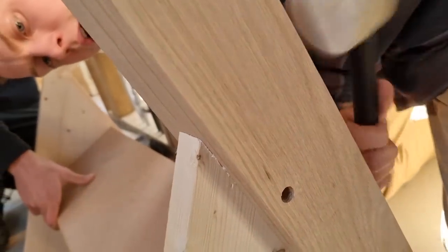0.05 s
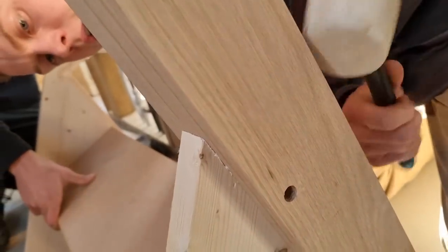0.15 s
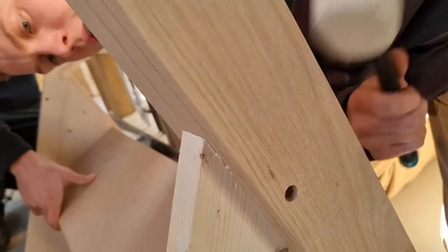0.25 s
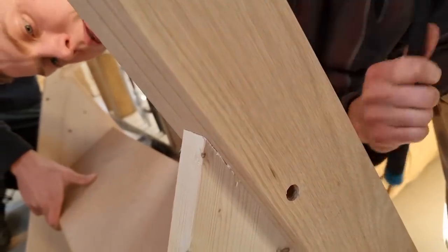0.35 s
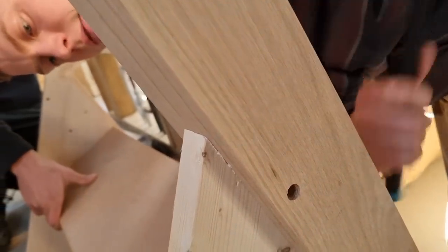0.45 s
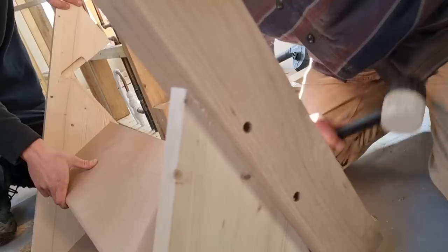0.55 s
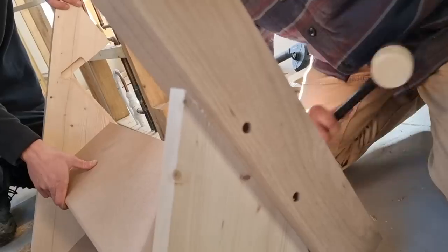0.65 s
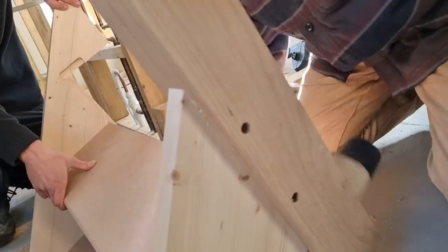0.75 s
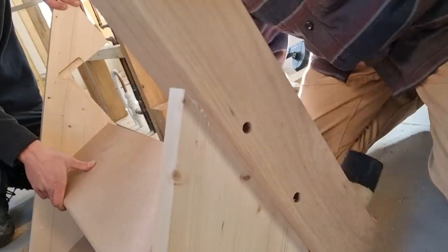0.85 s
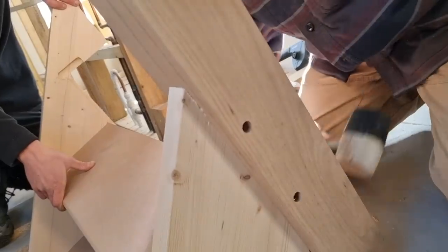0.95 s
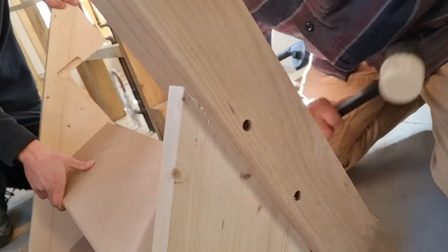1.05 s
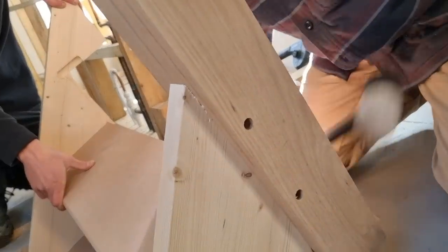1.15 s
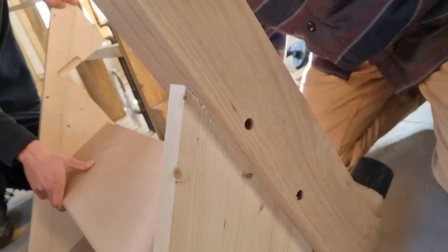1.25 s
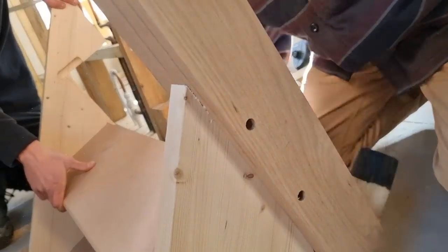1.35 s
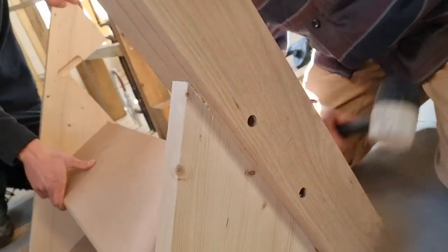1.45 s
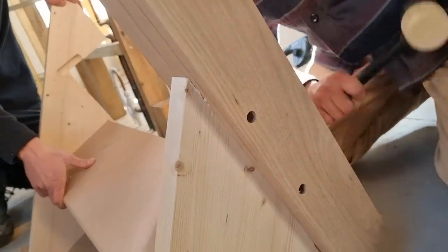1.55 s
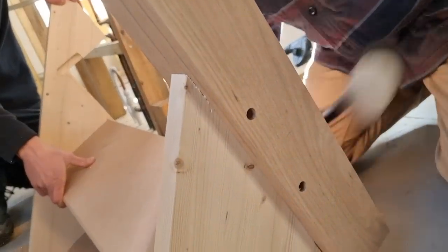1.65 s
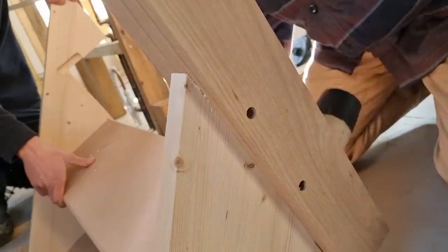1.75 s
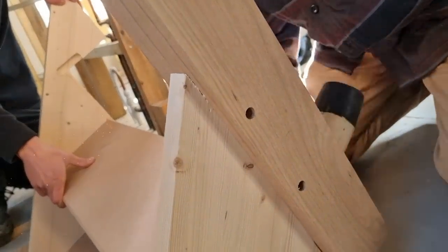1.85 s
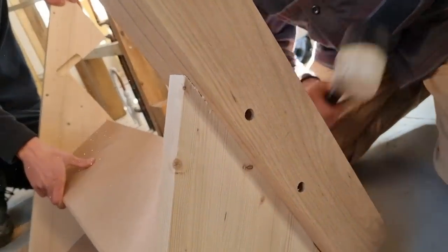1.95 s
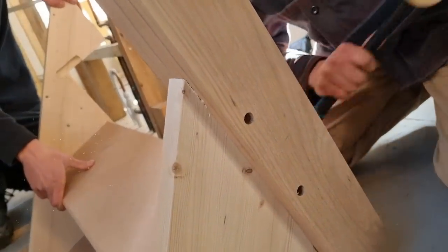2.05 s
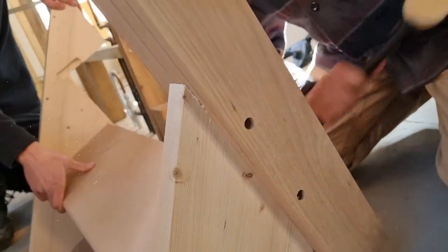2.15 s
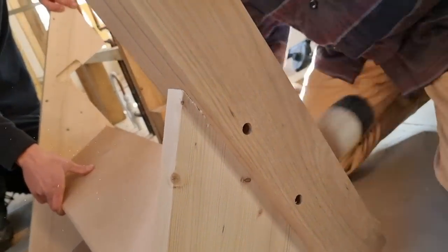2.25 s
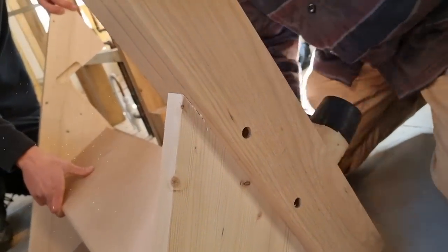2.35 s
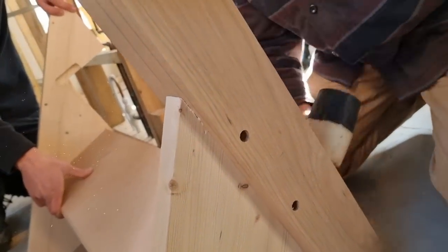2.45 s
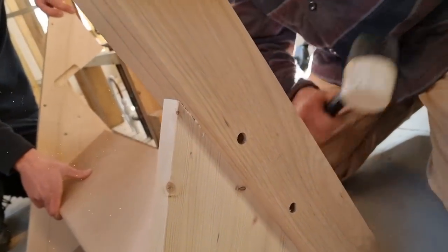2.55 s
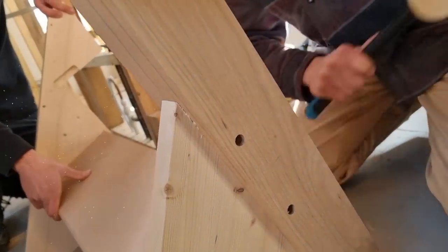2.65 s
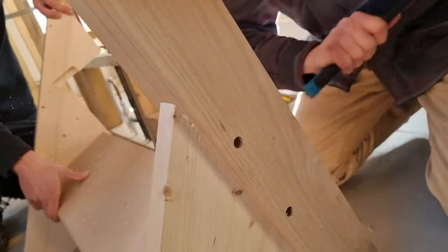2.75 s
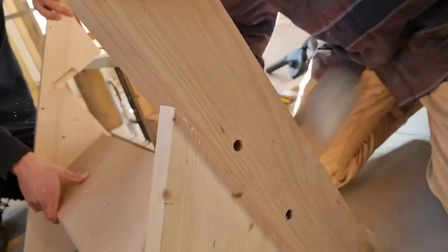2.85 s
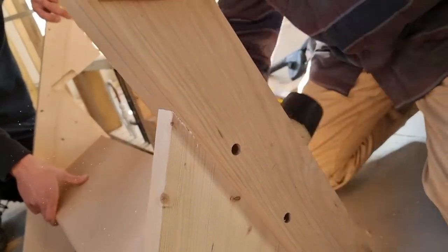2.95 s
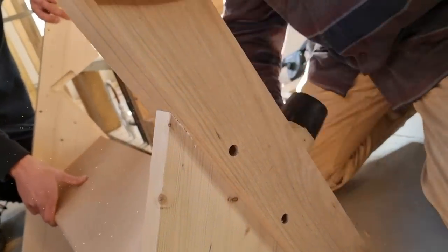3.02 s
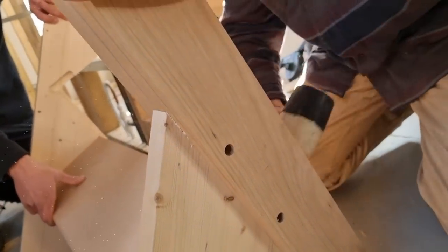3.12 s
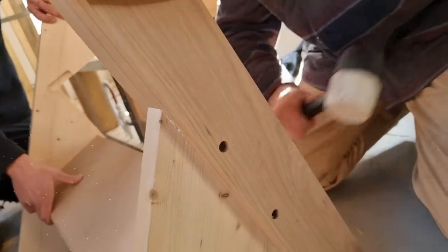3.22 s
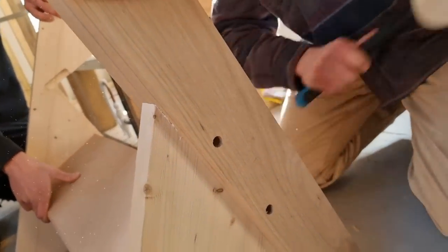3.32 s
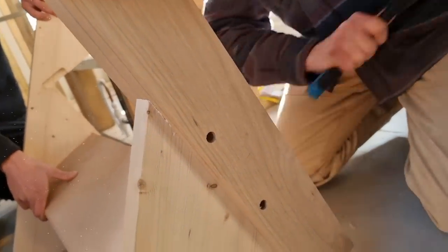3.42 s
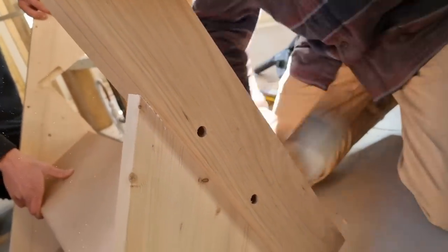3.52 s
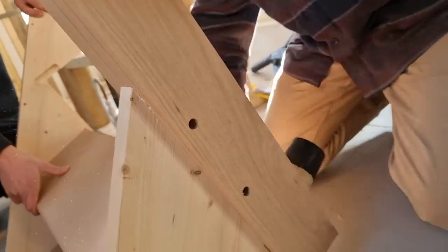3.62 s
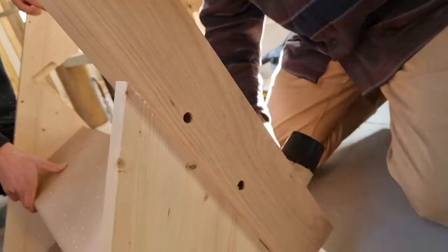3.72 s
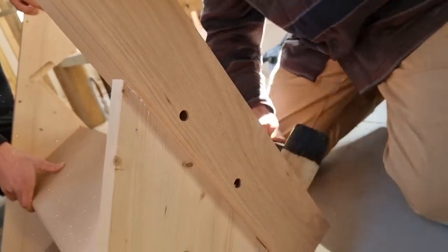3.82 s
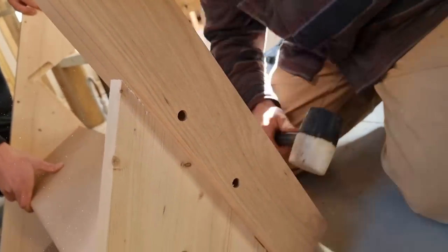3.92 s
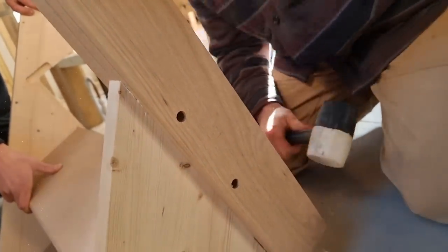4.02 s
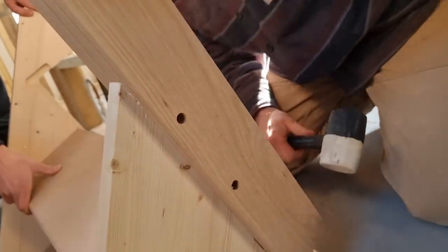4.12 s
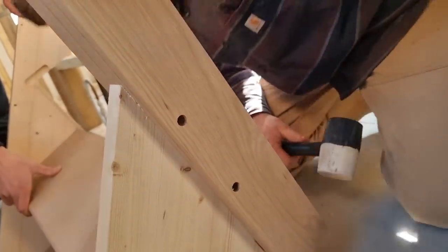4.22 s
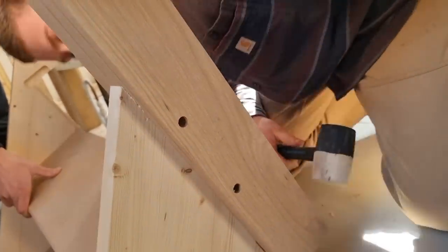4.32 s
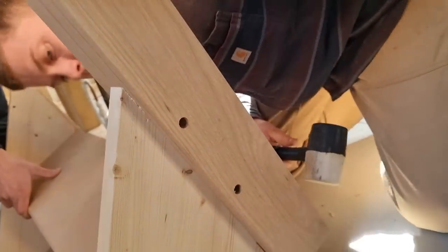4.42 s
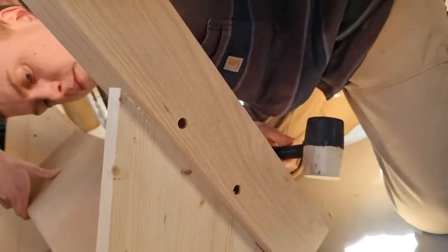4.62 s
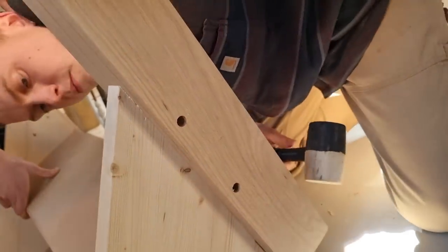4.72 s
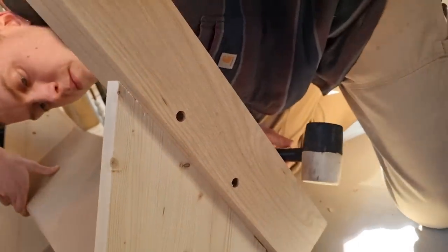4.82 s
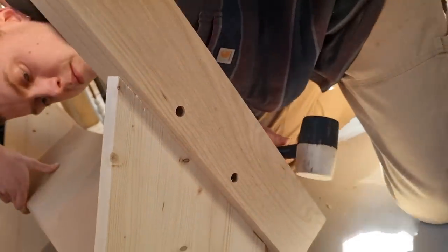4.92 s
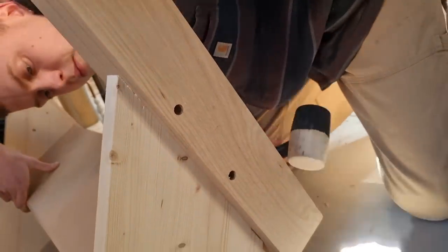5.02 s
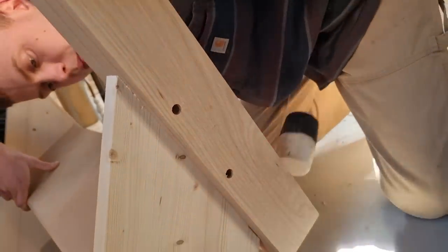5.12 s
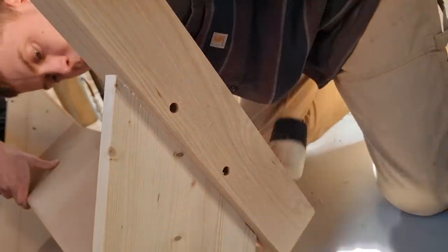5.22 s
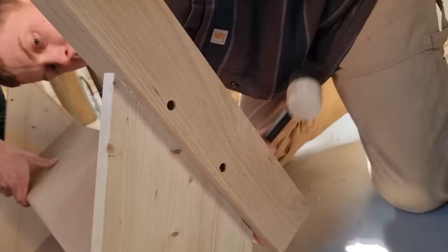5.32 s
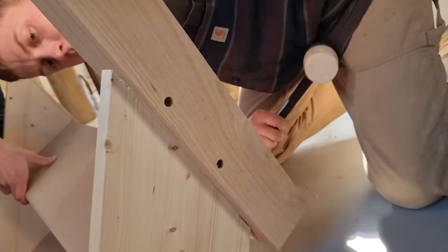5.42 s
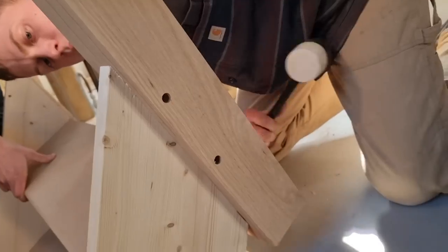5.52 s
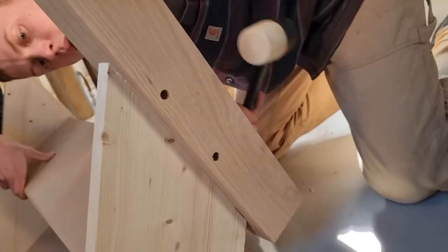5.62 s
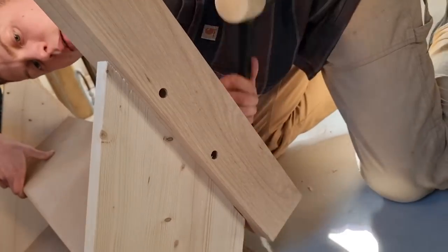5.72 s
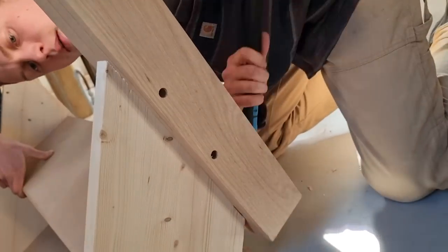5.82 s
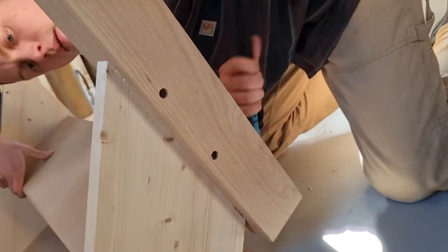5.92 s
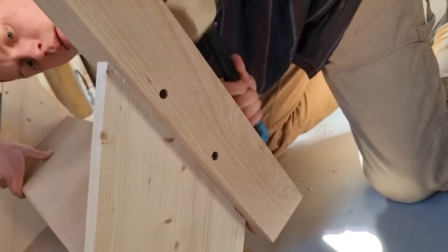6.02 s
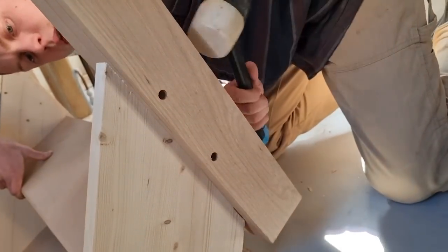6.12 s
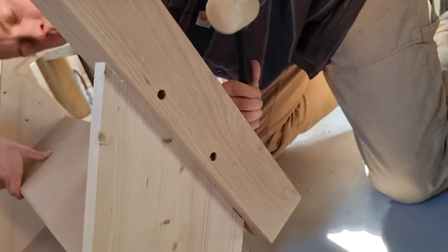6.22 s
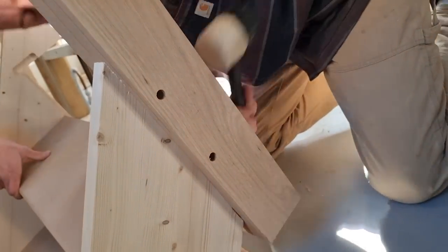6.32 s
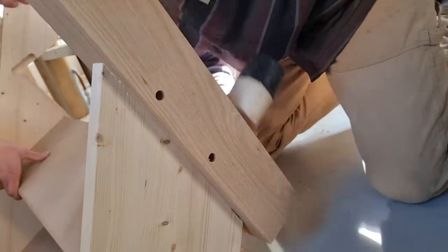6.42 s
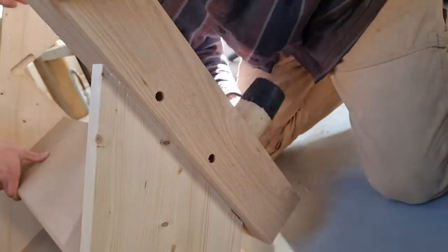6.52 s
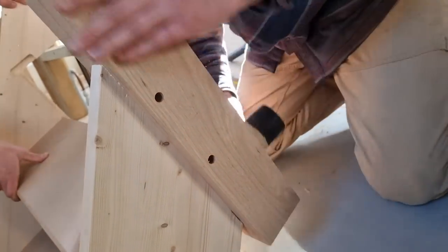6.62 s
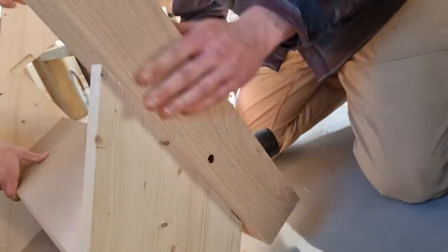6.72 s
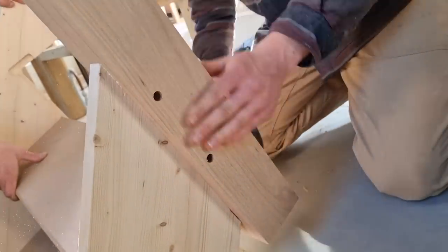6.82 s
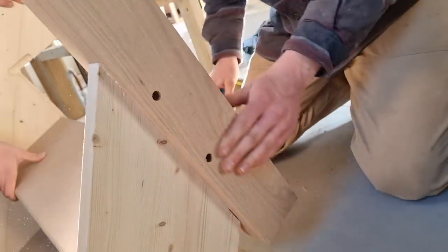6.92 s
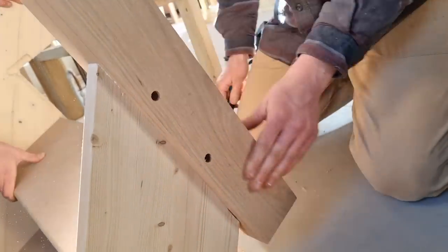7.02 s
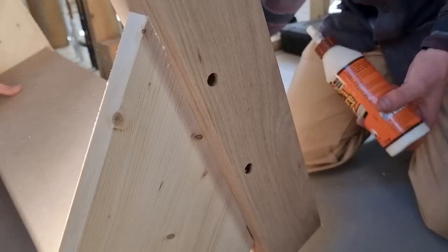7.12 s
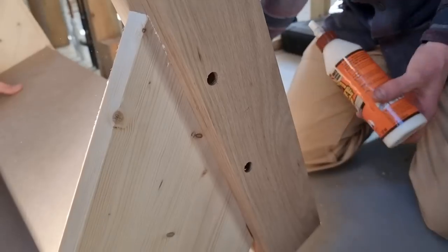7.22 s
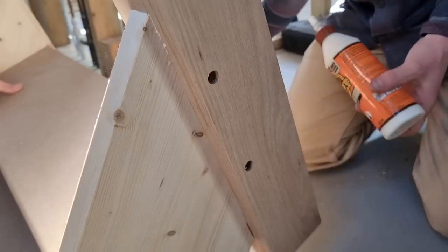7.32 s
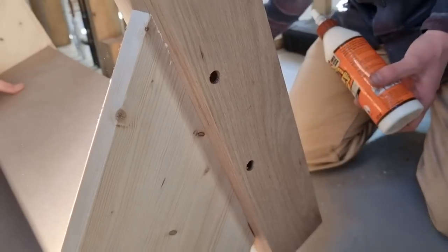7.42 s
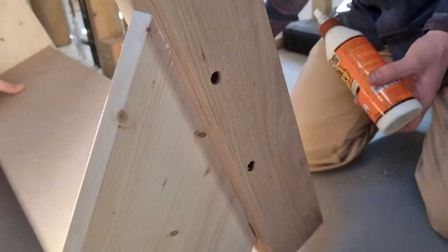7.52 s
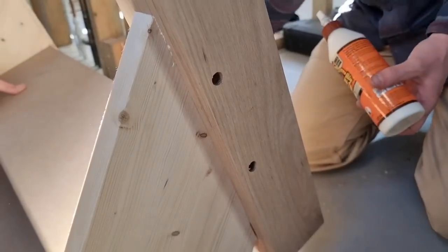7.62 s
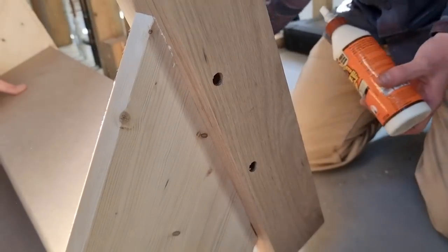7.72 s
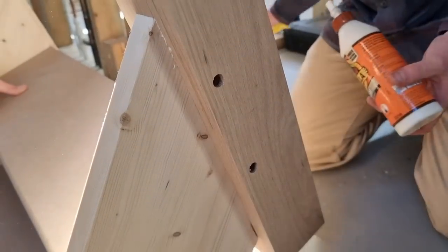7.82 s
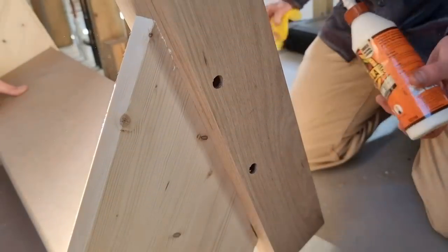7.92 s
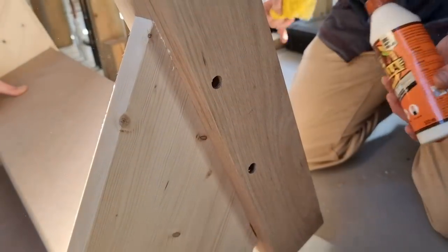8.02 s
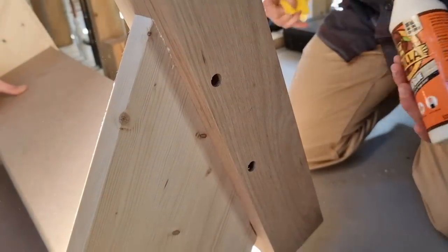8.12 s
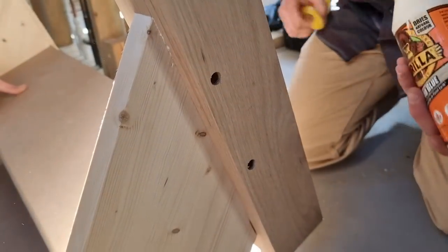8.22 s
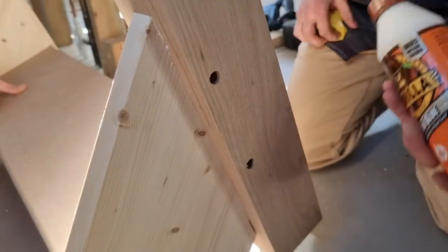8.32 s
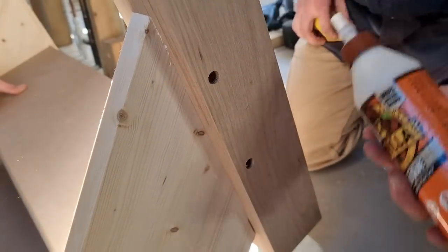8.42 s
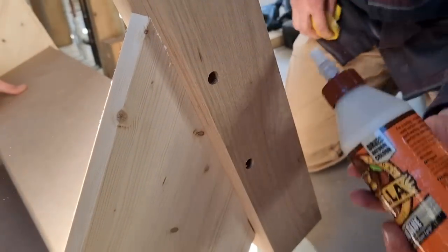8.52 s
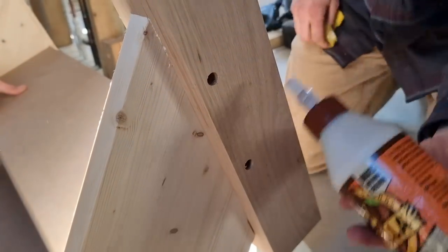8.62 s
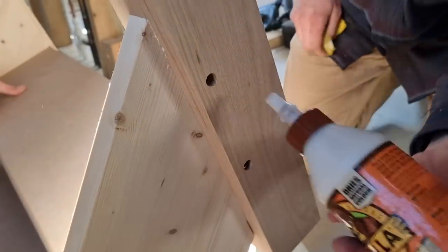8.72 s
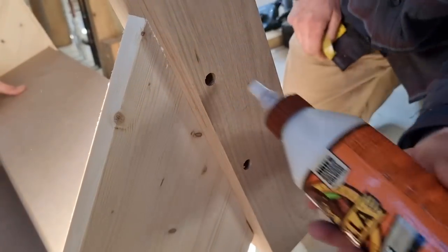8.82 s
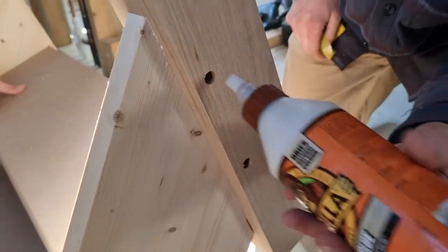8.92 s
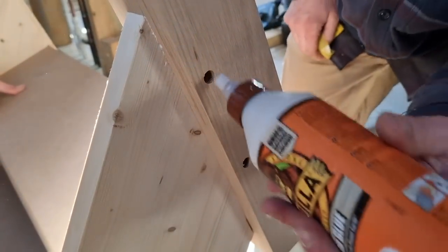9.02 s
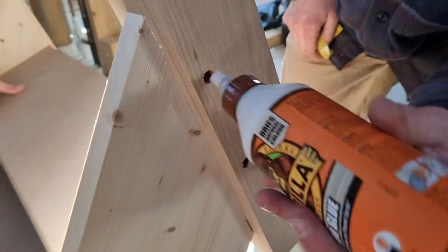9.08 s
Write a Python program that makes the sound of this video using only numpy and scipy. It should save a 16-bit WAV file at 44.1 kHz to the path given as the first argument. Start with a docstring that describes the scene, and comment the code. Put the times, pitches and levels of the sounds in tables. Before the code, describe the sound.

A boom from an earlier blow is fading in a bare, reverberant room, recorded close by a stereo phone. At 0.1 s a rubber mallet hits a timber post with a deep, low-pitched thud and short crack; its ringing cuts off abruptly near 0.55 s. Six more blows follow at about 0.8, 1.2, 1.7, 2.3, 2.9 and 3.6 s, hollow and woody with harder knocks, bright splitting snaps and small creaking ticks from the joint. The last one rings away into a pause. Cloth rustles at 4.7 s, then a soft bump at 5.0 and a faint tap at 5.2. Two heavier, duller blows land at 6.0 and 6.4 s. A palm hisses over the wood around 6.8 s, stopping sharply at 7.1. Until about 9 s there are only quiet scrapes, soft bumps, light clothing rustles and tiny bottle clicks over faint room air.

```python
"""The boom of an earlier blow dies away in a bare room while a rubber mallet drives a timber stair post
onto its joint, close to a phone: blows ring post and boards (decaying waves, filtered noise), the joint cracks.
A pause with a cloth rustle, a soft bump and one faint blow follows, then two more blows.
Then a palm wipes the wood, clothes rustle, things scrape (all filtered noise), soft bumps land on the timber
and a glue bottle is picked up and opened with clicks (short noise bursts). Faint room air lies under everything."""
import sys
import numpy as np
from scipy import signal
from scipy.fft import rfft, irfft, next_fast_len
from scipy.io import wavfile
from scipy.ndimage import uniform_filter1d, minimum_filter1d

SR = 44100
rng = np.random.default_rng(int(sys.argv[2]) if len(sys.argv) > 2 else 0)


def bounce(signal):
    """Save signal as a 16-bit WAV file at the path given by the first command-line argument."""
    frames = np.transpose(np.atleast_2d(signal))
    limited = np.clip(frames, -1, 1)
    pcm = np.round(limited * 32767).astype(np.int16)
    wavfile.write(sys.argv[1], SR, pcm)


N = 403515
RING = np.arange(int(1.2 * SR)) / SR  # time axis of one ring (s)
TOP_HZ = 16200  # upper edge of the sound


def strikes():
    """All blows, bumps and ticks share one wood and one room, so they belong together."""
    out, room = np.zeros((2, N)), diffuse()
    # the shorter the wave, the more its phase differs between the ports
    apart = np.minimum(np.array(TIMBER_MODES)[:, :1] / 280, 2.0)
    side = rng.choice([-1, 1], (len(TIMBER_MODES), 1)) * np.array([.5, -.5])
    phases = rng.uniform(0, 2 * np.pi, (len(TIMBER_MODES), 1)) + apart * side
    mallet_blows(out, phases, room)
    earlier_boom(out, phases, room)
    soft_bumps(out, phases, room)
    ticks(out)
    return out


# mallet blows, levels relative within a blow: (t/s, thump level/dB, spot on the post 0 = high up to 1 = foot,
# stair boom level/dB, knock level/dB, clack level/dB, joint slip level/dB, slip length/ms)
MALLET_BLOWS = [ (0.097, 0.5, 0.13, -8.5, -14, -27, -8, 0.34),
                (0.774, -2.5, 0.77, -6, -10, -16, -4.5, 1.88), (1.226, -3, 0.76, -9, -7.5, -18, -16, 1.6),
                (1.717, -0.5, 1, -7, -6.5, -18, -13.5, 1.38), (2.26, -2, 0.89, -9, -3.5, -14.5, -9, 2.28),
                (2.9031, -4, 0.89, -8, -7, -11.5, -14, 4.56), (3.569, -0.5, 0.57, -8, -3, -16, -15, 1.93),
                (5.225, -22.5, .02, -24.5, -32, -54.5, -90, 0.81),
                (6.002, 0, .12, -9, -18.5, -26.5, -22, 1.15),
                (6.383, -5, 0.27, -12.5, -19.5, -29.5, -20.5, 1.9)]


def mallet_blows(out, phases, room):
    """Each blow rings on until it fades or is cut off."""
    for s, *hit in MALLET_BLOWS:
        add(out, until_stop(blow(phases, room, *hit), s), s)


# towards the foot of the post its thump rises and its knock falls: f/Hz (high up, at the foot)
THUMP_HZ, KNOCK_HZ = (164, 243), (510, 372)
# at a slip of 1 ms: echo relative to the snap, top treble, and hard note relative to the clack
ECHO_DB, SPARKLE_DB, TOCK_DB = -19.5, -6, 2.5
# a longer slip raises all three (dB per doubling of its length)
ECHO_GROWTH_DB, SPARKLE_GROWTH_DB, TOCK_GROWTH_DB = 5, 5.5, 3.5


def blow(phases, room, thump_db, spot, boom_db, knock_db, clack_db, slip_db, slip_ms,
         body_db=-2.5, joint_db=-1.0):
    """The spot sets the pitch of the wood, the length of the slip sets how much the joint cracks."""
    doublings = np.log2(max(slip_ms, .1))
    joint = undb(ECHO_DB + ECHO_GROWTH_DB * doublings) * crack()
    add(joint, snap(slip_ms), 0)
    sparkle_db = SPARKLE_DB + SPARKLE_GROWTH_DB * doublings
    joint = colour(colour(joint, wood_ripple()), [(6000, 0.0046), (11000, sparkle_db)])
    thump_hz = np.interp(spot, (0, 1), THUMP_HZ)
    knock_hz = np.interp(spot, (0, 1), KNOCK_HZ)
    wood = body(phases, room, boom_db, thump_db, thump_hz, knock_db, knock_hz, clack_db)
    note = undb(clack_db + TOCK_DB + TOCK_GROWTH_DB * doublings) * tock()
    return undb(body_db) * wood + note + undb(joint_db + slip_db) * joint


# the dense ring of the whole stair in the room: (f/Hz, level/dB per Hz)
STAIR_COLOUR = [(25, -13.5), (50, -4.5), (100, -2), (145, -10), (200, 3), (400, 3), (540, 1.5), (630, -8.5),
                (800, -8), (1150, -14.5), (1500, -19), (2000, -24), (3200, -39.5)]


def body(phases, room, boom_db, thump_db, thump_hz, knock_db, knock_hz, clack_db,
         fresh=.7, modes_db=-4, stair_db=-1.5, push=2.5, contact_s=0.0084, valley_db=-4.5, give_s=0.0023):
    """Modes and dense ring, weighted by where and how hard the rubber lands."""
    # part of the room sound is the same each time, part is fresh
    stair = unit(colour(room + fresh * diffuse(), STAIR_COLOUR), size=4410)
    ring = undb(modes_db) * timber(phases) + undb(stair_db) * stair
    # while the rubber presses, the short bending waves of the post are driven directly
    bending = colour(ring, [(250, -17.5), (700, 1.5), (1400, -0.5), (2500, -6.0)])
    ring = ring + push * np.exp(-RING / contact_s) * bending
    # the further apart thump and knock lie, the deeper the valley between them
    valley = (thump_db + knock_db) / 2 + valley_db * np.log2(knock_hz / thump_hz) ** 2
    weights = [(20, boom_db - 12.0), (45, boom_db), (thump_hz / 1.8, boom_db), (thump_hz, thump_db),
               (np.sqrt(thump_hz * knock_hz), valley), (knock_hz, knock_db), (900, clack_db + 3)]
    soft_start = 1 - np.exp(-RING / give_s)  # the rubber gives way at first
    return colour(ring * soft_start, weights)


# modes of the post and its boards, before scatter: (f/Hz, relative level/dB, t60/s = time to fade by 60 dB)
TIMBER_MODES = [(58.9, -13.5, 0.98), (73.22, -17.5, 0.96), (85, -20, 0.89), (115.1, -18.5, 1),
                (161.2, -6, 0.42), (192.7, -7.5, 0.27), (205.5, -7.5, .4), (219.1, -8.5, 0.44),
                (238.5, -6, 0.31), (259.8, -7.5, .42), (265.8, 0.5, .46), (286, -8.5, .4), (341, -4, 0.49),
                (379.5, -2, 0.49), (414, -7.5, 0.43), (459.5, -7.5, 0.32), (488, -3, 0.23),
                (530.7, -1.5, 0.45), (740, -4, 0.29), (805.5, -12, 0.5), (947, -9.5, 0.24),
                (1032, -14.5, 0.48), (1297, -14.5, 0.17), (1440, -12.5, 0.19), (1470, -8.5, 0.23),
                (1573, -10.5, 0.15), (1870, -21.5, 0.17), (2360, -28.5, 0.34), (3760, -20, 0.15)]


def timber(phases, scatter_db=3.0, detune=.006):
    """The modes of the wood as fading waves; each blow lands on a slightly different spot."""
    out = 0
    scatter = rng.standard_normal((len(TIMBER_MODES), 2))
    for (hz, db, t60), phase, (size, shift) in zip(TIMBER_MODES, phases, scatter):
        wave = np.sin(2 * np.pi * hz * (1 + detune * shift) * RING + phase[:, None])
        out = out + undb(db + scatter_db * size) * wave * bloom(hz, t60)
    return unit(out, size=4410)


# the direct snap of the joint: (f/Hz, level/dB per Hz)
SNAP_COLOUR = [(400, -4), (1400, 3), (2200, 7), (4000, 4), (7200, 1), (9500, -16), (13500, -10),
               (16000, -14.5)]


def snap(slip_ms, spiky_db=4, right_db=3, apart=1.0):
    """The joint slips in a burst of tiny fractures, which reach the left port first."""
    size = 4096
    burst = np.exp(-(RING[:size] * 1000 / max(slip_ms, .2)) ** 2 / 2)
    grains = burst * undb(spiky_db * rng.standard_normal(size))
    ports = grains * (rng.standard_normal(size) + apart * rng.standard_normal((2, size)))
    ports[1] = np.roll(ports[1], 11)  # right port 0.25 ms later
    ports = colour(ports, SNAP_COLOUR)
    level = np.sqrt(2 * np.sum(burst ** 2) / np.sum(ports ** 2))
    return ports * level * tilt(right_db)


# splitting, rubbing fibres in the joint: (f/Hz, level/dB per Hz)
CRACK_COLOUR = [(500, -4), (1300, 6.5), (2200, 4.5), (4000, 5), (7200, -1), (8500, -25), (10500, -20),
                (13500, -4.5), (16000, -29.5)]


def crack(early=.6, early_s=0.039, right_db=2):
    """The snap comes back from nearby boards first, then from the walls."""
    echoes = diffuse() * (1 + early * np.exp(-RING / early_s))
    return unit(colour(echoes, CRACK_COLOUR), size=882) * tilt(right_db)


def tock(hz=1420, t60=0.023, spread=0.04, ports_apart=1.3):
    """The struck end of the post gives a short hard note, which meets the two ports out of phase."""
    pitch = hz * (1 + spread * rng.standard_normal((2, 1, 1)))  # two waves, slightly apart
    phase = rng.uniform(0, 2 * np.pi, (2, 1, 1)) + np.array([[0], [ports_apart]])  # radians
    note = np.sin(2 * np.pi * pitch * RING + phase).sum(axis=0)
    return note * np.exp(-np.log(1000) * RING / t60) * (1 - np.exp(-RING * hz))


def earlier_boom(out, phases, room, db=-17, s=-0.4):
    """The boom of an earlier blow is still dying away."""
    boom = body(phases, room, db, db, 185, db + 6, 500, db - 17.5)
    add(out, until_stop(boom, s), s)


# soft bumps of hands and knees, relative levels: (t/s, thump level/dB, knock level/dB, clack level/dB)
SOFT_BUMPS = [(5.014, -49, -65, -63), (7.214, -42, -74, -71), (7.476, -46.5, -54, -69),
              (7.544, -61, -66.5, -80), (7.941, -78, -68, -64.5)]


def soft_bumps(out, phases, room, damp_s=0.81, soft_s=0.00098):
    """Flesh lands slowly on the timber and damps it."""
    touch = np.exp(-RING / damp_s) * (1 - np.exp(-RING / soft_s))
    for s, thump, knock, clack in SOFT_BUMPS:
        add(out, body(phases, room, thump, thump, 152, knock, 470, clack) * touch, s)


# the joint ticks and creaks as it gives and settles, the mallet touches the wood just before one blow, the
# bottle cap clicks: (t/s, level/dB, length/ms)
TICKS_AND_CLICKS = [(0.1573, -27, 1.1), (0.762, -30.5, 7.8), (1.383, -43, 13), (1.767, -27.5, 2.3),
                    (1.877, -44, 9), (2.314, -31, 1.5), (3.581, -28.5, 3), (2.42, -47.5, 5.9),
                    (6.019, -18.5, 1.25), (6.075, -45, 5.5), (7.395, -36.5, 0.79), (7.411, -41, 2.4),
                    (8.572, -47.5, 4.8)]


def ticks(out, wet_db=-13):
    """Small bursts like the snap of the joint, each with an echo from the room."""
    echo = crack()
    for s, db, ms in TICKS_AND_CLICKS:
        add(out, undb(db) * colour(snap(ms), wood_ripple()), s)
        # a longer tick feeds the room more energy
        add(out, until_stop(undb(db + wet_db) * np.sqrt(ms / 4) * echo, s), s)


# whatever of the ringing, echoes and wipe still sounds stops short at these moments: (t/s)
STOP_TIMES = [.555, 7.125]


def until_stop(x, s):
    """Cut a sound that began at s at the next stop, with a fade of a few milliseconds."""
    end = min([stop for stop in STOP_TIMES if stop > s], default=np.inf)
    return x * np.clip((end - s - np.arange(x.shape[-1]) / SR) / 0.00843, 0, 1)


# decay in the room: (f/Hz, t60/s)
ROOM_DECAY = [(50, 0.93), (100, 0.76), (200, 0.35), (450, 0.51), (900, 0.46), (1500, 0.43), (2500, .46),
              (7000, 0.35), (9000, 0.37), (15000, 0.17)]


def diffuse():
    """Dense reflections, each half-octave with its own build-up and decay."""
    spectrum, out = rfft(field(len(RING))), 0
    octave = np.log2(np.maximum(np.fft.rfftfreq(len(RING), 1 / SR), 1))
    for centre in np.arange(4.5, 14.6, .5):
        part = irfft(spectrum * np.maximum(1 - 2 * abs(octave - centre), 0), len(RING))
        out = out + part * bloom(2 ** centre, lookup(ROOM_DECAY, 2 ** centre))
    return out


def bloom(hz, t60, cycles=11, first=0.53, slow_hz=150):
    """A ring spreads through stair and room over some cycles, so lows come late, then dies away."""
    at_once = first * hz / (hz + slow_hz)
    build_up = 1 - (1 - at_once) * np.exp(-RING * hz / cycles)
    return build_up * np.exp(-np.log(1000) * RING / t60)


def wood_ripple(depth_db=1.5, count=110):
    """Crowded high modes of the wood: random peaks and gaps for the spot touched, as (f/Hz, level/dB)."""
    gains = depth_db * np.clip(rng.standard_normal(count), -2, 2)
    gains[0] = 0
    return np.transpose([np.geomspace(600, TOP_HZ, count), gains])


def handling(right_db=3):
    """Wiping, cloth and scrapes all come from one sliding noise, a little louder on the right."""
    slide = friction()
    return (palm_wipe(slide) + cloth(slide) + scrapes(slide)) * tilt(right_db)


def friction(grain_db=1.0, size=110, wander=9):
    """Sliding contact: noise that catches and lets go, changing colour as the hand moves from spot to spot."""
    here, there = (colour(field(N), wood_ripple(depth_db=3.5)) for _ in range(2))
    place = np.cumsum(rng.standard_normal(N)) * np.sqrt(wander / SR)  # random walk
    catch = undb(grain_db * unit(uniform_filter1d(rng.standard_normal(N), size)))
    return catch * (here * np.cos(place) + there * np.sin(place))


WIPE_S, WIPE_RISE_S, WIPE_FALL_S, WIPE_DB = 6.76, 0.12, 0.34, -54
# the hiss of the palm on the post: (f/Hz, level/dB)
PALM_COLOUR = [(700, -19.5), (1200, -12), (1550, -2.5), (2300, -9), (3500, 0.5), (5000, -1.5), (7000, 3.5),
               (8500, -8.5), (13000, -4.5), (16000, -6)]


def palm_wipe(slide):
    """The palm wipes the post once, quick to start and slow to ease off, then stops short."""
    wipe = swell(WIPE_S, WIPE_RISE_S, WIPE_FALL_S) * (np.arange(N) / SR < STOP_TIMES[-1])
    return undb(WIPE_DB) * wipe * unit(colour(slide, PALM_COLOUR))


# the hiss of sliding cloth: (f/Hz, level/dB per Hz)
CLOTH_COLOUR = [(530, -28), (900, -2), (1570, -7.5), (2220, -3.5), (3550, 0), (5280, 0), (6970, -1),
                (8550, -11), (12600, -13.5), (16000, -10.5)]
# strokes of cloth, each a swell and a fade: (peak t/s, rise t/s, fall t/s, hiss level/dB, low rustle level/dB)
CLOTH_STROKES = [(4.685, 0.066, 0.084, -52.5, -50.5), (6.31, 0.085, 0.36, -62.5, -81),
                 (7.19, 0.073, 0.12, -62, -67), (7.62, 0.041, 0.078, -57.5, -64),
                 (7.74, 0.014, 0.035, -65, -82), (8.04, 0.19, 0.13, -64.5, -92),
                 (8.291, 0.072, 0.081, -55.5, -71), (8.57, 0.11, 0.13, -60, -74.5),
                 (8.749, 0.052, 0.11, -65.5, -82.5)]
RUSTLE_HZ, RUSTLE_OCTAVES = 327.2, 0.67


def cloth(slide):
    """Sliding cloth gives a bright hiss and a low rustle."""
    hiss, rustle = unit(colour(slide, CLOTH_COLOUR)), band(slide, RUSTLE_HZ, RUSTLE_OCTAVES)
    out = 0
    for s, rise, fall, hiss_db, rustle_db in CLOTH_STROKES:
        out = out + swell(s, rise, fall) * (undb(hiss_db) * hiss + undb(rustle_db) * rustle)
    return out


# short scrapes on wood and floor: (peak t/s, rise t/s, fall t/s, level/dB, centre f/Hz)
SHORT_SCRAPES = [(5.01, 0.061, 0.093, -65.5, 1300), (7.108, 0.017, .013, -49, 1400),
                 (7.32, 0.021, 0.046, -49.5, 966), (7.41, 0.088, 0.074, -60, 748),
                 (7.95, .012, 0.021, -65.5, 1990)]
SCRAPE_OCTAVES = 1.29


def scrapes(slide):
    """A brief slide on something hard sounds like noise around one pitch."""
    out = 0
    for s, rise, fall, db, hz in SHORT_SCRAPES:
        out = out + swell(s, rise, fall) * undb(db) * band(slide, hz, SCRAPE_OCTAVES)
    return out


def swell(peak_s, rise_s, fall_s):
    """A sliding movement gathers speed and slows again."""
    t = np.arange(N) / SR - peak_s
    return np.exp(-np.minimum((t / np.where(t < 0, rise_s, fall_s)) ** 2, 20))


# the steady air of the room, with a raised band near 490 Hz: (f/Hz, level/dB per Hz)
AIR_COLOUR = [(25, -13), (45, -8), (90, -7), (170, -16.5), (300, -9), (400, -5.5), (490, -2), (620, -13.5),
              (900, -19.5), (2000, -26), (6500, -27), (9000, -39), (16000, -48.5)]
AIR_DB = -70.5


def room_air():
    """Faint steady noise, coloured by the room."""
    return undb(AIR_DB) * unit(colour(field(N), AIR_COLOUR))


def field(size, alike_hz=230):
    """Diffuse noise at two ports: long waves reach both alike."""
    own, shared = rfft(rng.standard_normal((2, size))), rfft(rng.standard_normal(size))
    alike = 1 / (1 + (np.fft.rfftfreq(size, 1 / SR) / alike_hz) ** 2)
    return irfft(np.sqrt(alike) * shared + np.sqrt(1 - alike) * own, size)


def undb(db):
    """Decibels to gain."""
    return 10 ** (np.asarray(db) / 20)


def tilt(right_db):
    """Gains that make the right port this much louder than the left."""
    return undb(np.array([[-right_db], [right_db]]) / 2)


def lookup(table, hz):
    """Read (f/Hz, value) points on a log-frequency axis."""
    points, values = np.transpose(table)
    return np.interp(np.log(np.maximum(hz, 1)), np.log(points), values)


def colour(x, table):
    """Filter with a (f/Hz, level/dB) response that never sounds ahead of its input."""
    size = next_fast_len(x.shape[-1] // 2 + 2048) * 2
    cepstrum = irfft(np.log(undb(lookup(table, np.fft.rfftfreq(size, 1 / SR)))))
    # folding the cepstrum forward in time gives minimum phase
    cepstrum[1:size // 2] *= 2
    cepstrum[size // 2 + 1:] = 0
    return irfft(rfft(x, size) * np.exp(rfft(cepstrum)))[..., :x.shape[-1]]


def band(x, hz, octaves):
    """A bell-shaped band of x, at rms 1."""
    size = next_fast_len(N // 2 + 1) * 2
    distance = np.log2(np.maximum(np.fft.rfftfreq(size, 1 / SR), 1) / hz) / octaves
    return unit(irfft(rfft(x, size) * np.exp(-.5 * distance ** 2))[..., :N])


def unit(x, size=None):
    """Scale to rms 1 over the first samples, or over all of them."""
    return x / np.sqrt(np.mean(x[..., :size] ** 2))


def add(out, x, s):
    """Mix x in at time s."""
    i = int(s * SR)
    a, b = max(i, 0), min(i + x.shape[-1], out.shape[-1])
    out[:, a:b] += x[..., a - i:b - i]


def scene():
    """Carpentry over the faint air of the room."""
    return strikes() + handling() + room_air()


def limiter(x, top_db, hold_s=0.0067):
    """Turn both ports down for a moment around every peak that passes the top."""
    size = int(hold_s * SR) + 1
    need = np.minimum(1, undb(top_db) / (np.abs(x).max(axis=0) + 1e-9))
    return x * uniform_filter1d(minimum_filter1d(need, size), size)


def record(dry, bass_right_db=4.0, top_right_db=3):
    """The right port hears more bass and top; the phone holds down tall peaks and cuts the highest treble."""
    ports = []
    for x, side in zip(dry, (-1, 1)):
        response = [(90, side * bass_right_db / 2), (320, 0), (8000, 0.0007), (12000, side * top_right_db / 2)]
        ports.append(colour(x, response))
    held = limiter(np.array(ports), top_db=-1.2)
    treble_cut = signal.ellip(8, .2, 70, TOP_HZ, fs=SR, output="sos")
    return signal.sosfilt(treble_cut, held)


dry = scene()
out = record(dry)
bounce(out)
```